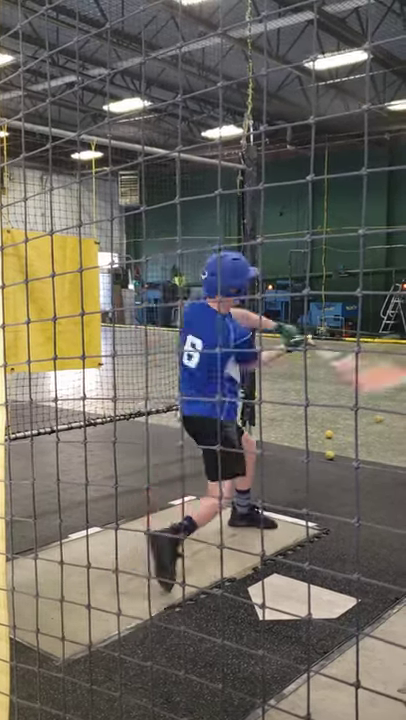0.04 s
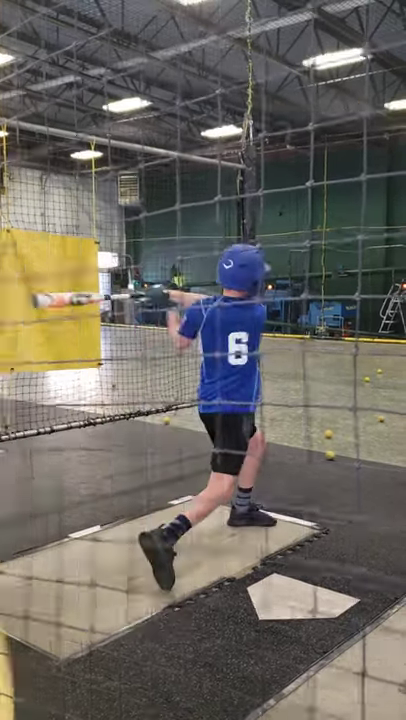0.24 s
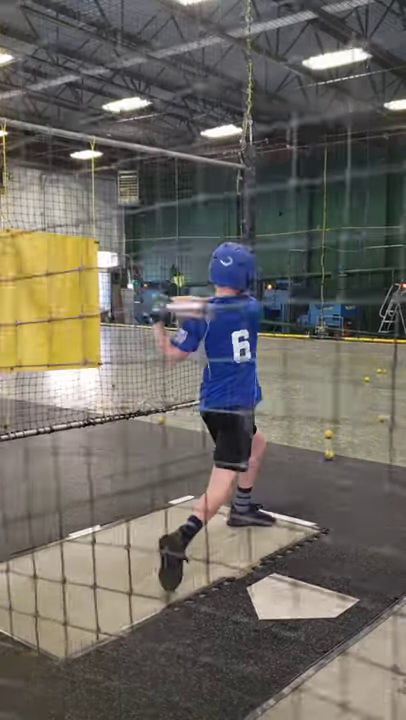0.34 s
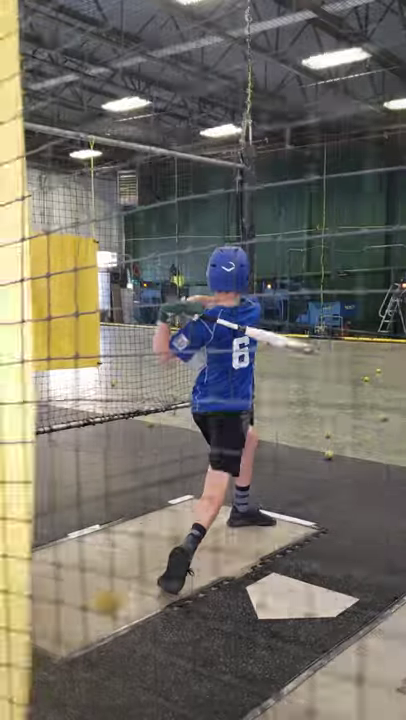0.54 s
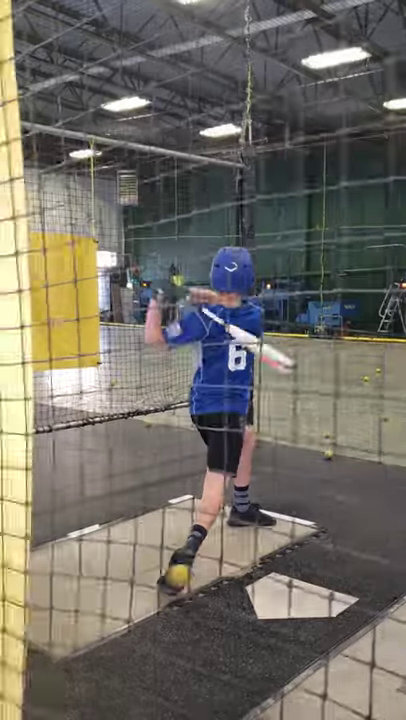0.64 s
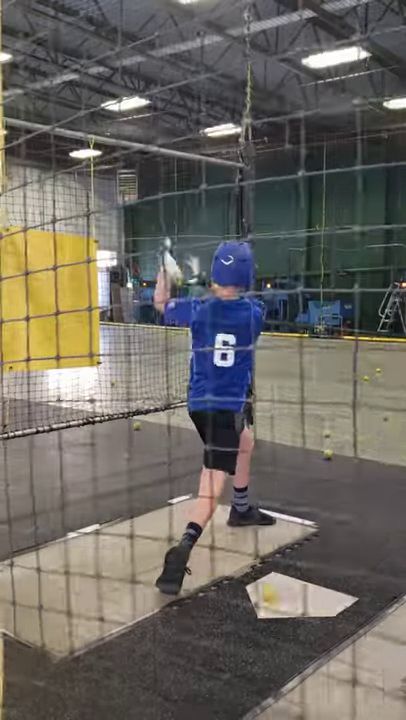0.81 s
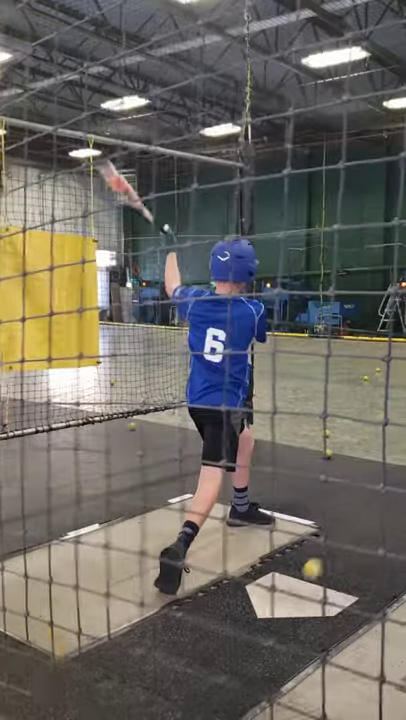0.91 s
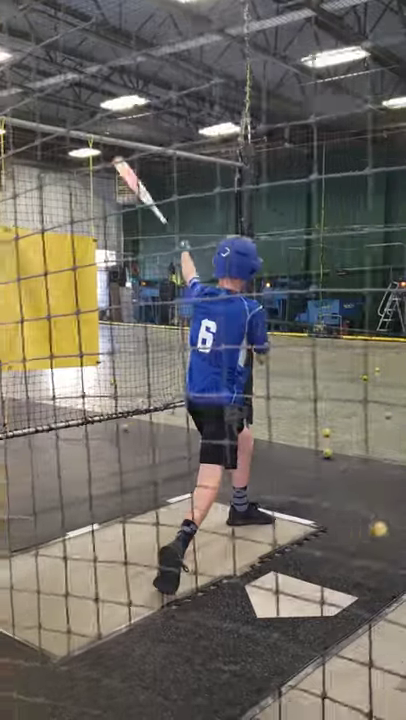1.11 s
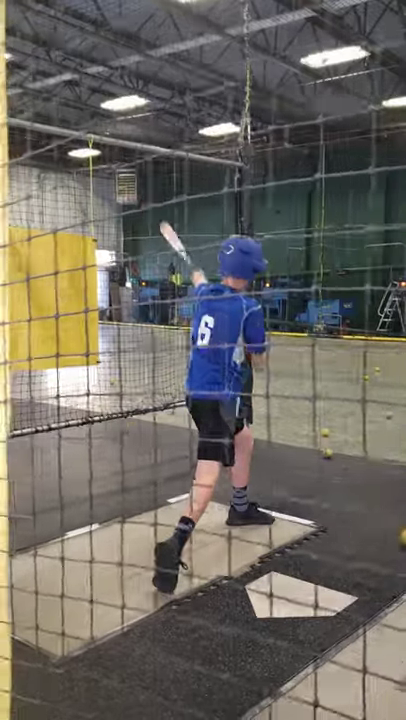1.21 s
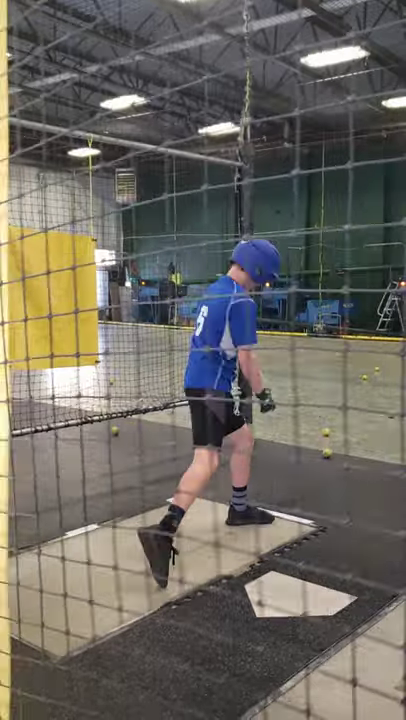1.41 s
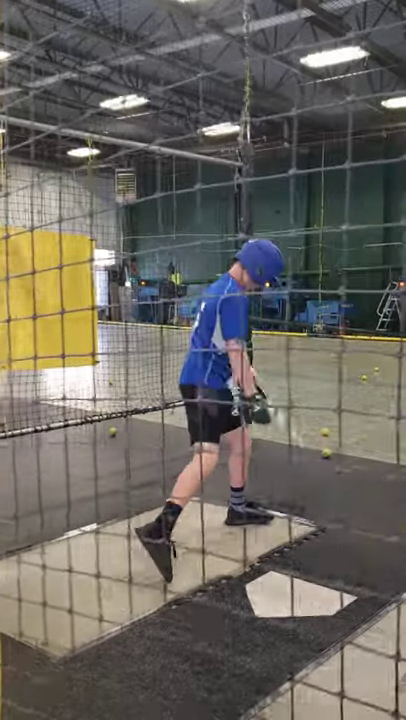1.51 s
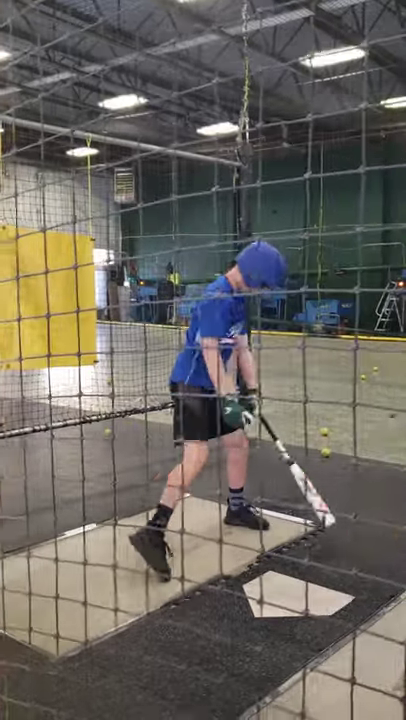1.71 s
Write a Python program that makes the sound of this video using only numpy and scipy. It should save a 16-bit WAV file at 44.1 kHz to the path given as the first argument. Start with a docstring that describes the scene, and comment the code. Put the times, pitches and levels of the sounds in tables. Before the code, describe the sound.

A ball slams into the padded side of a batting cage close by, just after the fading ring of a bat hit. Net hooks and chain rattle, then the ball taps softly on rubber mats in a large echoing hall.

```python
"""First comes the fading ring of a bat's crack in a large hall; then the ball slams into the padded side
of a batting cage close by. Quick pushes ring the panel into a deep thump, and net hooks and chain rattle
and tick in grainy bursts with short metal pings. The ball taps softly away on rubber mats, low echoes
come back from walls and roof, and the hall rings on over faint swishes and a ventilation rumble."""
import sys
import numpy as np
from scipy import signal
from scipy.fft import rfft, irfft
from scipy.io import wavfile
from scipy.ndimage import uniform_filter1d, minimum_filter1d

SR = 44100
rng = np.random.default_rng(int(sys.argv[2]) if len(sys.argv) > 2 else 0)


def log_audio(samples):
    """Write samples as a 16-bit WAV file to the path given in sys.argv[1]."""
    # one column per channel
    frames = np.atleast_2d(samples).T
    # limit to full scale, then quantise
    limited = np.clip(frames, -1, 1)
    pcm = np.round(limited * 32767).astype(np.int16)
    wavfile.write(sys.argv[1], SR, pcm)


N = 77175

# the ball's blows on the padding (time [s], level [dB], push length [s], direction [+1 or -1])
PAD_BLOWS = [(0.2249, -7, 0.00039, 1), (0.2258, -5.5, 0.00086, -1), (0.2278, -10.5, 0.00055, -1),
             (.2315, -7, 0.00066, 1), (.2355, -9, 0.00067, -1), (0.2415, -3, 0.0044, -1),
             (0.2435, 4.5, 0.0035, 1), (0.2497, -7, 0.0017, -1), (0.26, -24, 0.0026, 1),
             (.2785, -12.5, 0.0022, -1)]
# body of the thump: the padded panel's modes (pitch [Hz], level [dB], t60 [s])
PAD_MODES = [(65, -10.5, 0.07), (98, -4.5, 0.044), (117, -11.5, 0.12), (203, -4.5, 0.074), (372, -9, .04),
             (454.4, -12.5, .05), (517, -7, 0.031), (708, -0.5, 0.024), (820, -14.5, 0.09),
             (972, -4.5, 0.023), (1230, -19, .02)]


def padding_thump(pan_db=1, left_lag_s=0.00024):
    """Smooth pushes ring the damped panel; the thump reaches the left microphone port slightly late."""
    force = np.zeros((2, N))
    for start, db, push_s, direction in PAD_BLOWS:
        width = max(int(push_s * SR), 2)
        push = np.hanning(width + 2)[1:-1] * 2 / width
        add(force, start, np.sign(direction) * undb(db) * push, pan_db)
    thump = ring(force, PAD_MODES)
    thump[0] = np.roll(thump[0], int(left_lag_s * SR))
    return thump


# net hardware hits (time [s], level [dB], hold [s], tilt [dB/octave], ping pitch [Hz],
# ping over hiss [dB], ping t60 [s], left minus right [dB])
NET_HITS = [(.2247, -14, .003, -1, 2800, -9, .004, -3), (.2275, -18, .025, 1, 12000, -12, .002, -3),
            (.2525, -24, .004, -4, 5400, -3, .008, -4), (.2554, -18, .01, 0, 11490, -3, .025, -5),
            (.266, -22, .038, 0, 12500, -12, .003, -3), (.2712, -16, .002, 3, 7200, -4, .004, -6),
            (.2935, -27, .005, -2, 5050, 3, .015, -3), (.3035, -19, .006, -1, 6000, -6, .005, -3),
            (.3095, -20, .018, 0, 4950, -7, .006, -3), (.316, -30, .01, -2, 3700, -3, .008, -3),
            (.33, -31, .04, 0, 5000, -9, .015, -3), (.353, -32, .012, 0, 14500, -9, .01, -3),
            (.4105, -30, .018, 2, 11600, -6, .015, -3), (.461, -38, .008, 2, 11600, -6, .01, -3),
            (.4958, -33, .012, 2, 14200, -6, .015, -3), (.521, -42, .006, 2, 7300, -6, .01, -3),
            (.553, -43, .005, 3, 12000, -9, .01, -3), (.5856, -28, .006, 0, 11650, -9, .01, -3),
            (.63, -49, .02, 3, 11000, -9, .01, -3), (.7133, -31, .003, 3, 12110, -6, .006, -3),
            (.874, -52, .01, 6, 11800, -9, .01, -3), (.9184, -44, .002, 0, 6800, -2, .006, -3),
            (.932, -52, .006, 6, 12000, -9, .01, -3), (.9393, -49, .01, 6, 13000, -9, .01, -3),
            (.9902, -50, .009, 6, 12000, -9, .01, -3), (1.205, -57, .006, 5, 13420, 4, .11, -3),
            (1.275, -57, .014, -3, 3300, 0, .003, -3)]
# EQ curve of the rattles' hiss (frequency [Hz], gain [dB])
NET_EQ = [(1000, -22), (2000, -4), (3400, -6), (4400, -7), (5100, -1.5), (6200, -4.5), (7300, -0.5),
          (8600, -9), (10000, -5.5), (11600, -0.5), (13500, 3), (15300, -4.5), (16500, -28)]


def net_rattles(attack_s=0.00027, release_s=0.0025, grain_db=2, detune=0.006):
    """Hooks, chain and cord shake in grainy bursts; in each, three closely tuned pieces ping."""
    out, t = np.zeros((2, N)), np.arange(8192) / SR
    freqs = np.arange(4097) * SR / 8192
    octaves = np.log2(np.maximum(freqs, 1500) / 8000)
    for start, db, hold, tilt, ping_hz, ping_db, t60, pan_db in NET_HITS:
        envelope = np.minimum(t / attack_s, 1) * np.exp(-np.maximum(t - hold, 0) / release_s)
        grains = rng.standard_normal((3, 8192))  # left, right, shared
        grains *= undb(grain_db * np.repeat(rng.standard_normal(128), 64))
        colour = undb(curve(NET_EQ, freqs) + tilt * octaves) * (freqs > 1000)
        hiss = irfft(rfft(grains) * colour)
        hiss = (hiss[:2] + .4 * hiss[2]) / hiss.std() * envelope
        pieces = [(ping_hz * (1 + detune * offset), 0, t60) for offset in rng.standard_normal(3)]
        ping = ring(grains[:2] * envelope, pieces)
        ping *= np.sqrt(np.sum(hiss ** 2) / np.sum(ping ** 2))
        add(out, start, undb(db) * (hiss + undb(ping_db) * ping), pan_db)
    return out


def cage_reflections(sound, decay_s=0.042):
    """Dense first reflections around the cage give a sound a short, wide tail."""
    t = np.arange(SR // 2) / SR
    response = rng.standard_normal((2, len(t))) * np.exp(-t / decay_s)
    response /= np.sqrt(np.sum(response[0] ** 2))
    return signal.fftconvolve(sound, response, axes=1)[:, :N]


# the ball landing on the mats (time [s], level [dB])
MAT_TAPS = [(.586, -37), (1.275, -40.5), (1.508, -43), (1.69, -41)]


def ball_bounces(centre_hz=880, width_hz=1700, decay_s=0.0028):
    """Rubber mats deaden each bounce to a dull tap: a flick of noise through one broad resonance."""
    out, t = np.zeros((2, N)), np.arange(2048) / SR
    radius = np.exp(-np.pi * width_hz / SR)
    resonance = [1, -2 * radius * np.cos(2 * np.pi * centre_hz / SR), radius ** 2]
    for start, db in MAT_TAPS:
        tap = signal.lfilter([1], resonance, rng.standard_normal((2, len(t))))
        add(out, start, undb(db) * tap / tap.std() * np.exp(-t / decay_s))
    return out


# low echoes of the slam (time [s], pitch [Hz], level [dB], half width [s])
FAR_ECHOES = [(0.344, 168, -11, .025), (0.41, 75, -42, 0.013), (0.451, 130, -22, 0.011),
              (0.526, 160, -21, 0.02), (0.613, 72, -23, 0.032), (0.76, 75, -25.5, 0.016),
              (0.798, 160, -31, 0.043), (.92, 80, -30, 0.025), (1.02, 118, -35.5, 0.038)]


def far_echoes():
    """The thump comes back from far walls and roof as short, low sine swells."""
    t = np.arange(N) / SR
    return sum(undb(db) * swell(t, peak_s, width) * np.sin(2 * np.pi * (hz * t + rng.random()))
               for peak_s, hz, db, width in FAR_ECHOES)


# the hall's reverb per band (frequency [Hz], t60 [s], slam tail [dB], bat tail [dB], side minus mid [dB])
HALL_TAILS = [(32.4, 2.2, -53, -61, -10), (65, 2.55, -29, -50, -11), (111, 3, -27, -41, -16),
              (157, 2.49, -27, -31.5, -18), (294, 1.8, -32.5, -40, -8.5), (556, 2.22, -35.5, -46.5, -3.5),
              (1230, 2.36, -43.5, -54.5, 1.5), (2700, 2.42, -42.5, -52, -0.5),
              (4600, 1.59, -39.5, -57.5, 1.5), (6800, 1.37, -38.5, -55, 1), (8600, 1, -42.5, -67.5, -1.5),
              (12600, 1.43, -36, -51, 1), (15900, .9, -85, -69, -6)]


def hall(build_s=0.0067, slow_below_hz=300, flutter_db=2, flutter_hz=25):
    """Fluttering noise bands carry the reverb of bat and slam, plus the swishes and the ventilation."""
    out, t = 0, np.arange(N) / SR
    since_slam = np.maximum(t - PAD_BLOWS[0][0], 0)
    bands_hz = 30 * 2 ** np.arange(0, 9.2, 1 / 4)
    step = int(SR / flutter_hz)
    for hz, vent_power in zip(bands_hz, ventilation_power(bands_hz)):
        db_per_s = -60 / curve(HALL_TAILS, hz)
        bloom = 1 - np.exp(-since_slam / build_s / (1 + slow_below_hz / hz))  # lows build up later
        slam_power = undb(curve(HALL_TAILS, hz, column=2) + db_per_s * since_slam) ** 2 * bloom
        bat_power = undb(curve(HALL_TAILS, hz, column=3) + db_per_s * t) ** 2
        envelope = np.sqrt(slam_power + bat_power + vent_power + swish_power(t, hz))
        flutter = uniform_filter1d(np.repeat(rng.standard_normal(N // step + 1), step), step)[:N]
        side = undb(curve(HALL_TAILS, hz, column=4)) * noise_band(hz) * np.array([[1], [-1]])
        mid = noise_band(hz)
        out = out + envelope * undb(flutter_db * flutter) * (mid + side)
    return out


# faint swishes of cloth and net (time [s], half width [s], level [dB], centre [Hz])
CLOTH_SWISHES = [(0.158, 0.053, -55.5, 12700), (.17, .05, -51, 3100), (1.53, 0.026, -72, 12800),
                 (1.72, 0.022, -67.5, 3460)]


def swish_power(t, hz, db_per_octave=9):
    """Cloth and net swish in soft swells; their power in a band falls away from each centre pitch."""
    return sum(undb(db - db_per_octave * abs(np.log2(hz / centre_hz))) ** 2 * swell(t, peak_s, width)
               for peak_s, width, db, centre_hz in CLOTH_SWISHES)


# room tone (frequency [Hz], relative spectral density [dB])
ROOM_TONE = [(30, -25), (60, -6.5), (122, -1.5), (250, -10.5), (360, -9.5), (450, -16), (1120, -26.5),
             (3000, -35.5), (5000, -43.5), (7400, -42), (8500, -56), (12000, -40), (16000, -51)]


def ventilation_power(bands_hz, total_db=-44.5):
    """Ventilation and far activity lay a steady low bed, its power shared out over the bands."""
    power = undb(curve(ROOM_TONE, bands_hz)) ** 2 * bands_hz
    return power * undb(total_db) ** 2 / power.sum()


def undb(db):
    """Decibels to amplitude."""
    return 10 ** (np.asarray(db) / 20)


def curve(rows, hz, column=1):
    """One column of a table read on a log-frequency axis."""
    rows = np.array(rows)
    return np.interp(np.log(np.maximum(hz, 1)), np.log(rows[:, 0]), rows[:, column])


def swell(t, peak_s, width_s):
    """A bell-shaped fade in and out."""
    return np.exp(-((t - peak_s) / width_s) ** 2)


def noise_band(hz):
    """Unit noise about a quarter of an octave wide."""
    freqs = np.maximum(np.arange(N // 2 + 1) * SR / N, 1)
    noise = irfft(rfft(rng.standard_normal(N)) * np.exp(-(np.log2(freqs / hz) * 5) ** 2), N)
    return noise / noise.std()


def ring(force, modes):
    """A force rings a set of modes, each a decaying sine."""
    out = 0
    for hz, db, t60 in modes:
        pole = np.exp(2j * np.pi * hz / SR - np.log(1000) / (t60 * SR))
        out = out + undb(db) * signal.lfilter([1], [1, -pole], force).imag
    return out


def pan(sound, pan_db):
    """Place a sound in stereo; pan_db is left minus right."""
    return sound * undb(np.array([[pan_db], [-pan_db]]) / 2)


def add(out, start_s, sound, pan_db=0):
    """Mix a panned sound in at its start time."""
    first = int(start_s * SR)
    sound = sound[..., :N - first]
    out[:, first:first + sound.shape[-1]] += pan(sound, pan_db)


def scene():
    """Thump and rattles up close, bounces and hall behind; the mix leans slightly right."""
    rattles = net_rattles()
    close = padding_thump() + rattles + undb(-12) * cage_reflections(rattles)
    return pan(close + ball_bounces() + far_echoes() + hall(), pan_db=-1.1)


def record(dry, limit_db=-1.2, look_ahead_s=0.0073, release_s=0.085, low_cut_hz=44, high_cut_hz=16000):
    """The phone's look-ahead limiter ducks just before the loudest peaks; bottom and top are cut."""
    ahead = int(look_ahead_s * SR)
    peak = np.abs(dry).max(axis=0) + 1e-9
    target = minimum_filter1d(np.minimum(undb(limit_db) / peak, 1), 2 * ahead + 1)
    pole = np.exp(-1 / (release_s * SR))
    recovery = signal.lfilter([1 - pole], [1, -pole], target - 1) + 1
    gain = uniform_filter1d(np.minimum(target, recovery), ahead)
    out = signal.sosfilt(signal.ellip(8, .2, 70, high_cut_hz, fs=SR, output="sos"), dry * gain)
    out = signal.sosfilt(signal.butter(3, low_cut_hz, "high", fs=SR, output="sos"), out)
    return np.clip(out, -1, 1)


dry = scene()
out = record(dry)
log_audio(out)
```